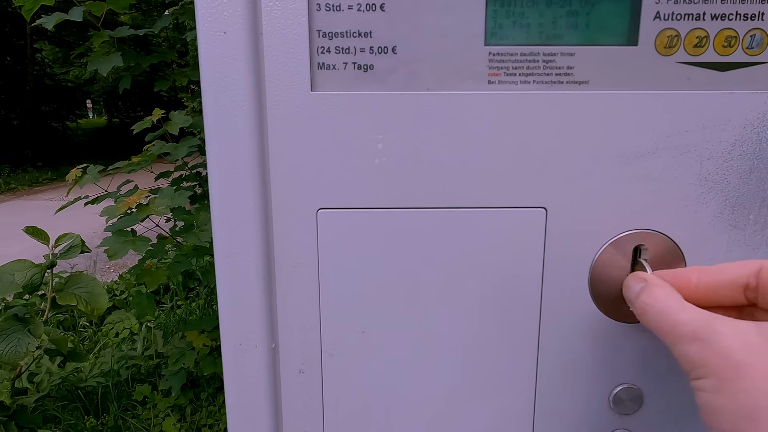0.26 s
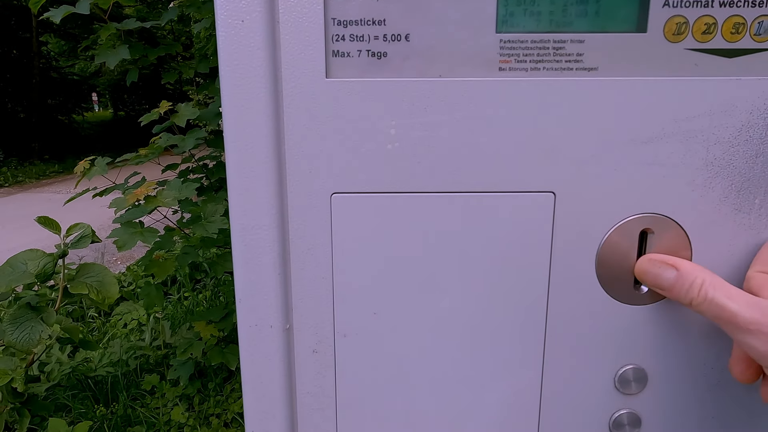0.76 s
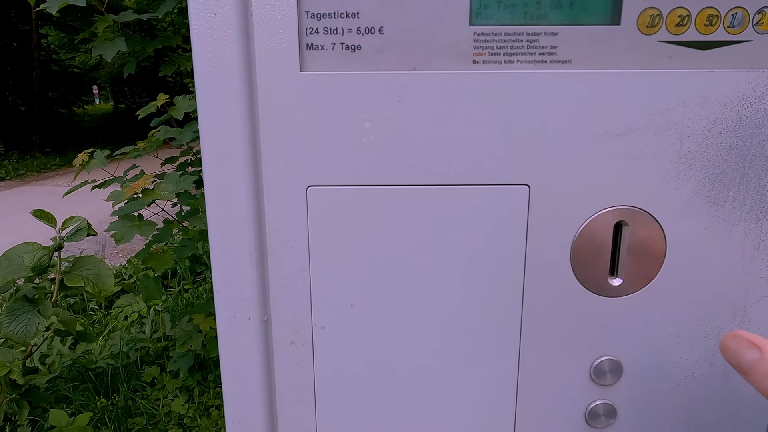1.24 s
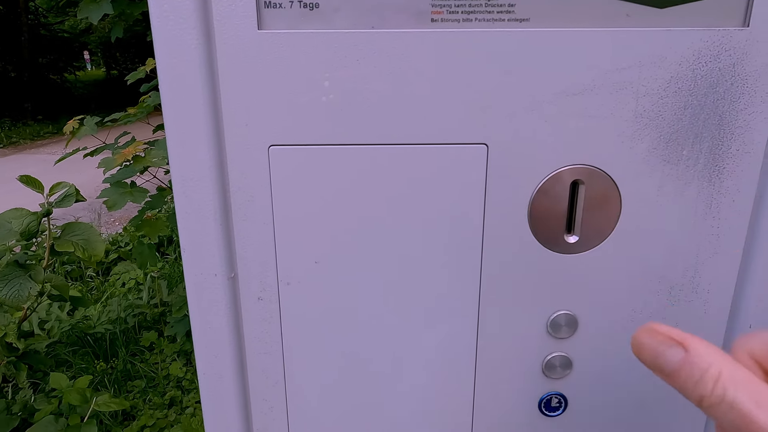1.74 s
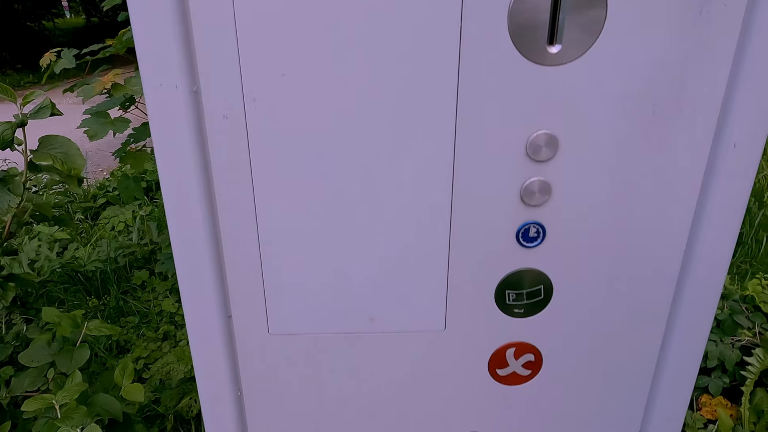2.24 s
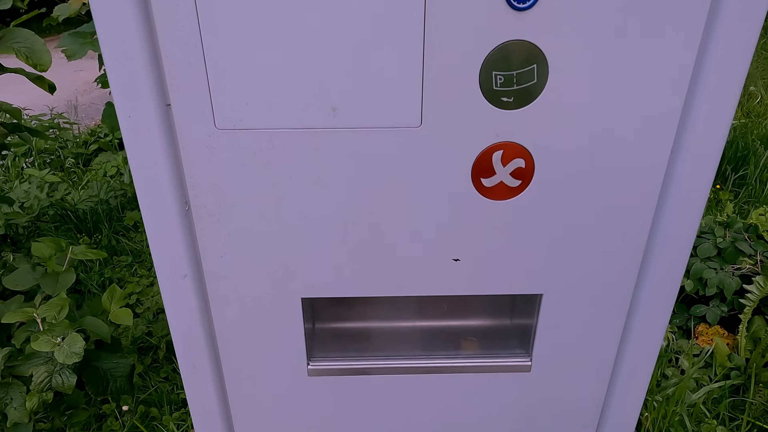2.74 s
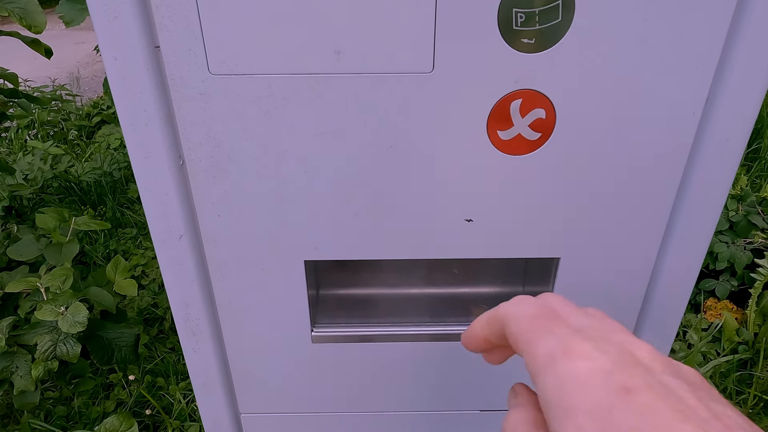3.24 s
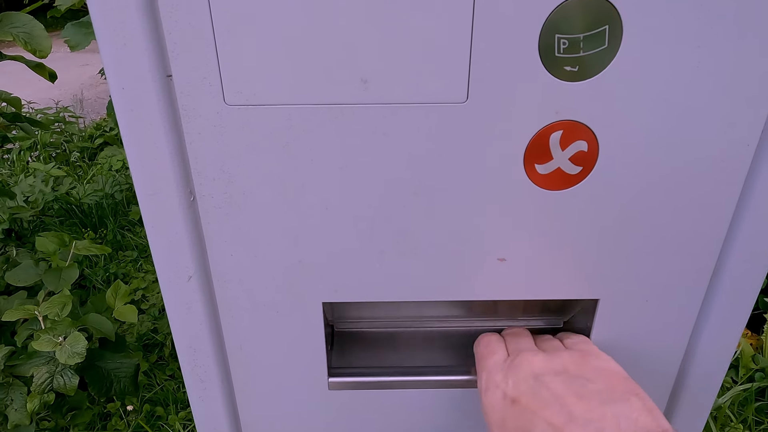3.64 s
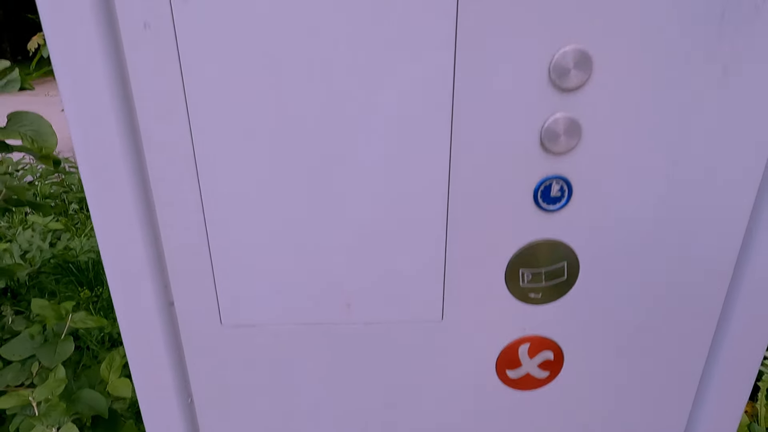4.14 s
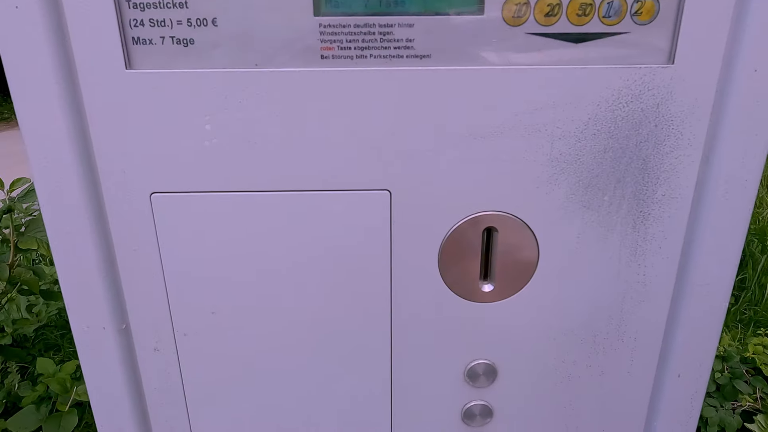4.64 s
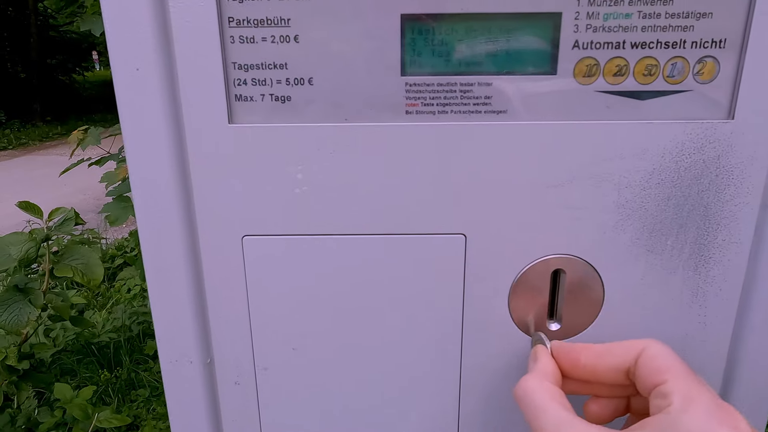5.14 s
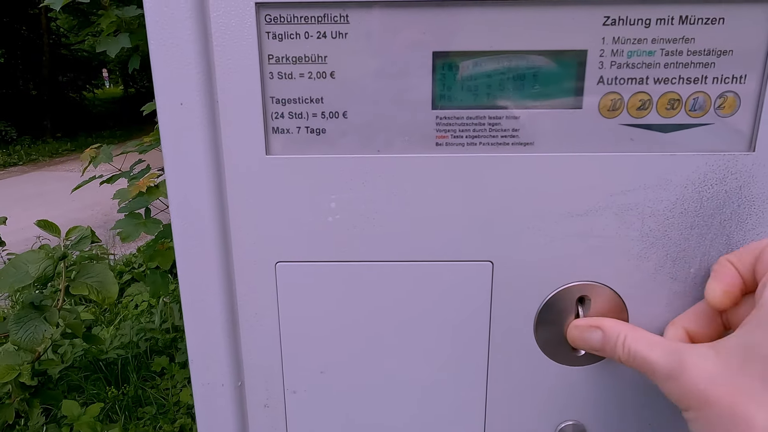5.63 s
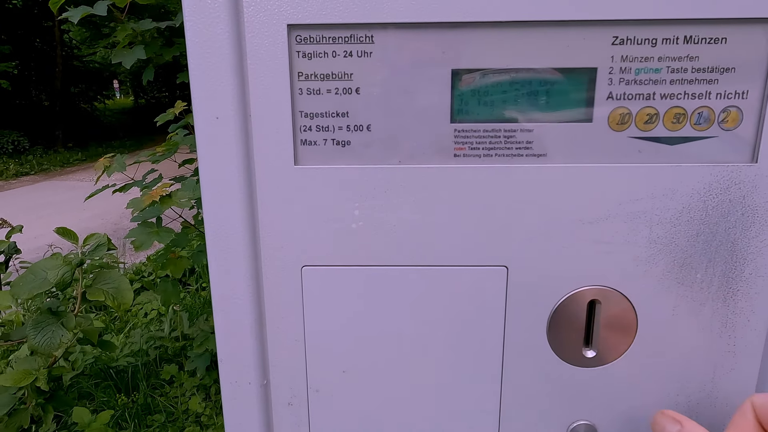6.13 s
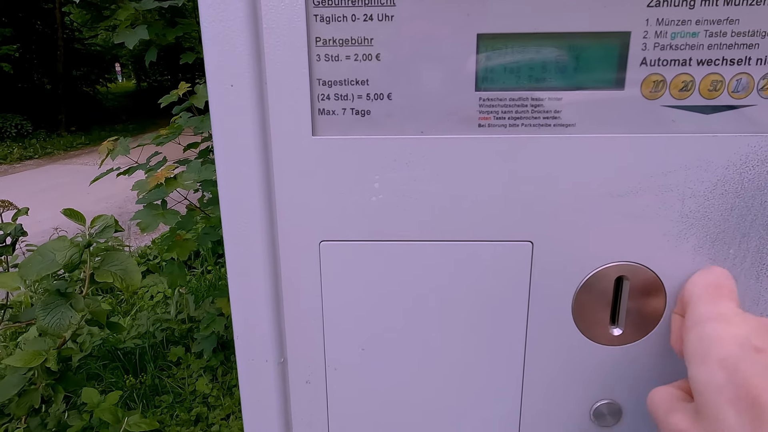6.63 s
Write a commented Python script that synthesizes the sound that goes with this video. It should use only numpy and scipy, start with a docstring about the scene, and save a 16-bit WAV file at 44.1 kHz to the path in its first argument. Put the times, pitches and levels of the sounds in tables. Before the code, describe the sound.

Outdoors in very quiet air, a coin edge ticks against a steel slot, then drops with a short rolling rumble and two hard knocks, clattering brightly into a return tray and rocking to rest. A metal flap knocks open, scrapes, creaks and slams with a hollow clang. More slot taps follow, and a coin drops inside again. Close, nearly mono microphone.

```python
"""Coins in a parking ticket machine

In quiet outdoor air a coin taps the slot; one then runs through the checker and clatters into the return tray.
A hand opens the tray's creaking flap and lets it slam; then a coin goes in again. Blows are filtered noise
bursts plus decaying sines, rolling and rubbing are random grains, and all ring in one steel cabinet."""
import sys
import numpy as np
from scipy import signal
from scipy.fft import rfft, irfft
from scipy.io import wavfile
from scipy.ndimage import uniform_filter1d

SR = 44100
rng = np.random.default_rng(int(sys.argv[2]) if len(sys.argv) > 2 else 0)


def to_wav(sig):
    """Store sig (one row per channel, or 1-D mono) as 16-bit WAV at the path in sys.argv[1].

    Samples outside -1..1 are clipped; the rate is SR.
    """
    pcm = np.clip(np.atleast_2d(sig), -1, 1) * 32767
    pcm = np.round(pcm).astype(np.int16)
    wavfile.write(sys.argv[1], SR, pcm.T)  # frames by channels


N = 303496
TIME = np.arange(N) / SR

# spectrum of the ramp's rumble and the gate's clatter: f/Hz, relative level/dB
RAMP_GATE_COLOUR = [(30, -29), (58, 4.5), (80, -31), (125, 2.5), (200, -8.5), (290, -1), (436, -3),
                    (517, -2.5), (700, 2.5), (1130, -8), (1730, -20.5), (4700, -26.5), (10000, -35)]


def amp(db):
    """Decibels to gain."""
    return 10 ** (np.asarray(db) / 20)


def unit(x):
    """Scales to rms 1."""
    return x / np.sqrt(np.mean(x ** 2) + 1e-20)


def read(points, hz):
    """Interpolates a table on a log-frequency axis."""
    f, value = np.transpose(points)
    return np.interp(np.log(hz + 1), np.log(f + 1), value)


def add(mix, s, sound):
    """Adds a sound into the mix at time s."""
    part = mix[max(round(s * SR), 0):][:len(sound)]
    part += sound[:len(part)]


def uneven(x, gain_db):
    """Applies a gain per frequency bin."""
    return irfft(rfft(x) * amp(gain_db), len(x))


def tint(x, colour):
    """Gives a steady sound a spectrum, at rms 1."""
    return unit(uneven(x, read(colour, np.fft.rfftfreq(len(x), 1 / SR))))


def band(x, lo_hz, hi_hz):
    """Causal band-pass."""
    sos = signal.butter(3, [lo_hz, min(hi_hz, .49 * SR)], "band", fs=SR, output="sos")
    return signal.sosfilt(sos, x)


def fuzzy_tone(hz, width_hz, size=N):
    """Noise in one steep-sided resonance, at rms 1."""
    f = np.fft.rfftfreq(size, 1 / SR)
    resonance = 1 / (1 + (2 * (f - hz) / width_hz) ** 4)
    return unit(irfft(rfft(rng.standard_normal(size)) * resonance, size))


def grit(per_s, spread_db):
    """Random micro-impacts of uneven size, at rms 1."""
    sizes = amp(spread_db * np.minimum(rng.exponential(1, N), 4))
    hit = rng.random(N) < per_s / SR
    return unit(rng.standard_normal(N) * sizes * hit)


def fade(t, t60):
    """Free decay by 60 dB in t60."""
    return np.exp(-np.log(1000) * t / np.maximum(t60, 1e-3))


def stroke(s, rise_s, length_s, fall_db_per_s):
    """Gain of one movement: it picks up speed, holds until its length is over, then dies away."""
    rise = np.clip((TIME - s) / rise_s, 0, 1) ** 2
    return rise * amp(-fall_db_per_s * np.clip(TIME - s - length_s, 0, 1))


def ringing(modes, t):
    """Each mode is a sine that dies away freely."""
    hz, db, t60 = np.transpose(modes)[:, :, None]
    return amp(db) * fade(t, t60) * np.sin(2 * np.pi * hz * t)


def blows(rows, colour, modes, bands_db, clatter_t60, soft_rings, dull_rings, ring_db, cabinet_db,
          rattle_db, rattle_t60, bass_hold, ripple_db):
    """Each blow is a crack of dense sheet-metal modes, a weaker rattle, and clear modes of part and cabinet."""
    # bands_db: bass, body, presence, sparkle against the blow's strength
    # soft_rings, dull_rings: dB of decay time per dB of softness, dullness
    # cabinet modes: f/Hz, relative level/dB, t60/s
    cabinet_modes = [(60.9, -15, 0.46), (116.7, -12, 0.37), (141.8, -15, 0.17), (211, -15, 0.12),
                     (432.6, -19.5, 0.36), (724, -17, 0.37), (998, -23, .6), (1028, -34, 1.6),
                     (1070, -38.5, 1.4), (1283, -36.5, 1.2)]
    # limits of the four bands: f/Hz
    edges = [50, 350, 1500, 7500, 17000]
    # level change of each band per dB of brightness [dB/dB]: hard contacts tip the sound upwards
    tilt = [-0.76, -0.54, 0.03, 0.68]
    crack_db, crack_t60 = -6, 0.009

    out, t = np.zeros(N), np.arange(32768) / SR
    head = SR // 100  # 10 ms, sets each burst's level
    all_modes = list(modes) + [(hz, db + cabinet_db, t60) for hz, db, t60 in cabinet_modes]
    mode_hz = np.transpose(all_modes)[0]
    rings = amp(ring_db) * ringing(all_modes, t)
    mode_band = np.searchsorted(edges[1:-1], mode_hz)
    hz, knots_hz = np.fft.rfftfreq(len(t), 1 / SR), np.arange(0, SR / 2, 110)
    part_ripple = rng.standard_normal(len(knots_hz))
    usual_db = np.mean([row[1] for row in rows])

    for s, strength_db, brightness_db in rows:
        gains = amp(strength_db + np.array(bands_db) + brightness_db * np.array(tilt))
        t60 = clatter_t60 * amp(soft_rings * (usual_db - strength_db) - dull_rings * brightness_db)
        # treble resonances belong partly to the part, partly to the spot struck
        spot_ripple = rng.standard_normal(len(knots_hz))
        ripple = np.interp(hz, knots_hz, np.tanh((part_ripple + spot_ripple) / 2))
        clatter = tint(rng.standard_normal(len(t)), colour)
        dense = uneven(clatter, ripple_db * ripple * np.minimum(hz / edges[2], 1))
        for k, hold in enumerate([bass_hold, 1, 1, 1]):
            crack = amp(crack_db) / hold * fade(t, crack_t60)
            rattle = amp(rattle_db) * fade(t, rattle_t60)
            burst = band(dense * (crack + fade(t, t60 * hold) + rattle), edges[k], edges[k + 1])
            add(out, s, gains[k] * burst / np.std(burst[:head]))
        # the point of contact sets each mode's strength and sign
        contact = rng.choice([-1, 1], len(mode_hz)) * rng.uniform(.7, 1.3, len(mode_hz))
        add(out, s, (gains[mode_band] * contact) @ rings)
    return out


def background(air_db=-71, hiss_db=-73, hiss_hz=4680, hiss_width_hz=620):
    """Quiet outdoor air, a steady narrow hiss, and a faint hollow sound dying away at the start."""
    # outdoor air: f/Hz, relative level/dB
    air_colour = [(20, -1.5), (30, -23), (55, -1.5), (85, -12), (135, -10), (260, -18.5), (400, -15.5),
                  (550, -19), (850, -18.5), (1500, -23), (3000, -32.5), (6000, -33.5), (16000, -38.5)]
    # hollow resonances: f/Hz, width/Hz, relative level/dB
    hollow_tones = [(361, 71, 8), (675, 110, 1.5), (890, 61, 4.5), (1630, 320, 2.5), (880, 3400, 4.5),
                    (2400, 300, -28)]
    hollow_db, hollow_fall_db_per_s = -51.5, 102
    air = amp(air_db) * tint(rng.standard_normal(N), air_colour)
    hiss = amp(hiss_db) * fuzzy_tone(hiss_hz, hiss_width_hz)
    hollow = unit(sum(amp(db) * fuzzy_tone(hz, width_hz) for hz, width_hz, db in hollow_tones))
    return air + hiss + hollow * amp(hollow_db - hollow_fall_db_per_s * TIME)


def slot():
    """A coin's edge taps the slot, whose steel rings briefly."""
    # taps: t/s, strength/dB, brightness/dB
    taps = [(0.1244, -61.5, -28.5), (0.246, -41.5, 1), (0.2639, -41.5, -12), (0.2793, -50.5, -16),
            (0.3148, -48, -16), (0.3332, -36.5, 6), (0.3362, -36, -4.5), (0.4103, -46.5, -10),
            (0.4608, -60, 24), (0.4654, -42, 7), (0.612, -40.5, 1), (1.3932, -52.5, -3), (1.4074, -47, -3),
            (1.4174, -35.5, 1), (5.1063, -35.5, -8.5), (5.3128, -45, -0.5), (5.335, -44, -16.5),
            (5.4105, -40.5, 14), (5.4160, -35.5, -8), (5.6222, -36.5, 10.5), (5.7518, -37.5, 2),
            (5.8002, -54.5, -13), (6.5138, -53.5, 5), (6.537, -39.5, 6.5), (6.5454, -36, 3)]
    # clatter spectrum: f/Hz, relative level/dB
    colour = [(35, -44), (60, -19), (250, -1.5), (380, -11.5), (903, -8), (1440, -7.5), (1780, -8.5),
              (2650, -2), (3190, -1.5), (5860, 3), (8320, -16), (11000, -17), (16000, -31)]
    # slot modes: f/Hz, relative level/dB, t60/s
    modes = [(927, -8, 0.0837), (2600, -14.5, .07), (5380, -23.5, .05), (7020, -10, 0.04)]
    return blows(taps, colour, modes, bands_db=[-30, -19, -13.5, -17.5], clatter_t60=0.059,
                 soft_rings=0.05, dull_rings=0.18, ring_db=5.0, cabinet_db=-1,
                 rattle_db=-16, rattle_t60=0.18, bass_hold=3.2, ripple_db=8.5)


def gate():
    """The gate behind the slot knocks dully and excites only the cabinet's modes."""
    # knocks: t/s, strength/dB, brightness/dB
    knocks = [(0.5468, -56.5, -10), (1.5022, -39, 3.5), (5.6558, -55.5, 0.5), (5.704, -53, 2),
              (6.5507, -41.5, -4)]
    return blows(knocks, RAMP_GATE_COLOUR, [], bands_db=[-7.0, -3, -18, -32.5], clatter_t60=0.19,
                 soft_rings=-0.083, dull_rings=-0.28, ring_db=4.5, cabinet_db=4.5,
                 rattle_db=-14.0, rattle_t60=0.12, bass_hold=3.35, ripple_db=5.0)


def rolling(panel_db=-3, attack_s=0.012):
    """The coin's milled edge drums on the ramp and wakes the cabinet's panels."""
    # rumbles on the ramp: t/s, length/s, level/dB, fall/(dB/s)
    rumbles = [(0.553, 0.12, -57, 173), (1.52, 0.052, -55.5, 99), (5.634, 0.16, -63, 246),
               (6.556, 0.073, -45.5, 171)]
    panels = unit(sum(fuzzy_tone(hz, width_hz=7.9) for hz in [138.3, 722, 974, 1138.4]))
    drumming = tint(grit(per_s=5100, spread_db=1.0), RAMP_GATE_COLOUR)
    rumble = unit(drumming + amp(panel_db) * panels)
    return rumble * sum(amp(db) * stroke(s, attack_s, length_s, fall) for s, length_s, db, fall in rumbles)


def squeaks(width_hz=420, scratch_db=-9):
    """Short squeaks: bursts of narrow noise with some scratch."""
    # squeaks: t/s, length/s, f/Hz, level/dB
    rows = [(0.666, 0.014, 2010, -61.5), (3.761, 0.059, 5520, -61.5), (4.037, 0.015, 6100, -46.5),
            (5.254, 0.041, 3780, -56.5), (5.271, 0.014, 1970, -60.5), (5.619, 0.0076, 4100, -54.5)]
    out = np.zeros(N)
    for s, length_s, hz, db in rows:
        size = int(length_s * SR)
        scratch = unit(band(rng.standard_normal(size), 1200, 9000))
        squeak = fuzzy_tone(hz, width_hz, size=size) + amp(scratch_db) * scratch
        add(out, s, amp(db) * unit(squeak * np.hanning(size)))
    return out


def checker():
    """The coin strikes the parts of the checker."""
    # hits: t/s, strength/dB, brightness/dB
    hits = [(1.4851, -24.5, 1.5), (1.515, -26, -4), (1.575, -47.5, 0), (6.6037, -24.5, -2.5),
            (6.633, -26.5, -3.5), (6.6905, -46, 1), (6.7598, -48.5, -4)]
    # clatter spectrum: f/Hz, relative level/dB
    colour = [(35, -38), (60, -7), (146, 0), (212, -14), (294, -3.5), (527, -3), (651, -1), (924, -11),
              (1380, -7), (1550, -14), (1950, -9), (3580, -8.5), (6000, -7), (13900, -19), (16000, -41.5)]
    # checker modes: f/Hz, relative level/dB, t60/s
    modes = [(830, 0.5, 0.033), (1992, -18, 0.24), (2940, -22.5, 0.1386), (4614, -22, 0.19),
             (6000, -10, 0.047), (6400, -12.5, .07), (6630, -6.5, 0.013), (12480, -11, 0.055),
             (14400, -9.5, .05)]
    return blows(hits, colour, modes, bands_db=[-26.5, -22.0, -16.5, -20.5], clatter_t60=0.0666,
                 soft_rings=0.096, dull_rings=0.367, ring_db=8, cabinet_db=-4,
                 rattle_db=-14.0, rattle_t60=0.16, bass_hold=2.5, ripple_db=14)


def pings():
    """The coin's own disc modes ring freely as it glances off a pin."""
    # contacts: t/s, level/dB
    contacts = [(1.575, -49.5), (6.691, -59), (6.758, -65)]
    # disc modes: f/Hz, relative level/dB, t60/s
    coin_modes = [(6245, 0, 0.1), (1900, -8.5, 0.23), (2790, -8, 0.12), (4690, -5, 0.1008),
                  (7327, -21.5, 0.111), (9170, -7, 0.037), (14000, -19, 0.087)]
    out, t = np.zeros(N), np.arange(SR // 4) / SR
    ring = ringing(coin_modes, t).sum(axis=0)
    for s, db in contacts:
        add(out, s, amp(db) * ring)
    return out


def tray():
    """The coin falls and bounces in the return tray."""
    # hits: t/s, strength/dB, brightness/dB
    hits = [(1.7634, -19, 7.5), (1.7664, -20.5, 6), (1.7804, -29.5, -1.5), (1.8422, -34.5, -16),
            (1.8731, -39, -4), (1.8924, -45.5, -2), (1.927, -50.5, -4), (1.9465, -28, 7),
            (1.9964, -40.5, -7), (2.0053, -38, -5.5), (2.0174, -38, 2.5), (2.0806, -51.5, -4),
            (2.1296, -39, -0.5), (2.169, -40, -2), (2.1934, -41.5, -3), (2.541, -62, -11)]
    # clatter spectrum: f/Hz, relative level/dB
    colour = [(35, -36.5), (60, -8.5), (164, -23.5), (380, -13.5), (437, -15.5), (503, -10), (579, -9.5),
              (991, 0.5), (1700, -15.5), (3040, -7), (4030, -12.5), (4530, -5.5), (5330, -11.5),
              (8510, -21.5), (16000, -37)]
    # tray modes: f/Hz, relative level/dB, t60/s
    modes = [(423.3, -12.5, 0.16), (597, -9.5, 0.17), (1018, -12, 0.18), (1080, -10.5, .16),
             (1225, -2.5, 0.13), (2970, -21, 0.21), (3496, -7, 0.033), (4420, -5.5, 0.051),
             (7000, -7.5, 0.057), (8300, -6.5, 0.053), (11800, -16.5, 0.12)]
    return blows(hits, colour, modes, bands_db=[-29.5, -11.5, -12.5, -17.5], clatter_t60=0.056,
                 soft_rings=0.15, dull_rings=-0.072, ring_db=0.5, cabinet_db=0,
                 rattle_db=-17.5, rattle_t60=0.19, bass_hold=1.2, ripple_db=5)


def rocking(start_s=2.239, turn_s=0.0535, shrink=0.995, second_s=.015, db=-67, fall_db=2.2, uneven_db=2,
            t60=0.051, ring_db=-2):
    """The coin rocks to rest in the curved tray, ever faster and fainter: two ringing ticks per turn."""
    out, t = np.zeros(N), np.arange(SR // 8) / SR
    for k in range(11):
        s = start_s + turn_s * np.sum(min(shrink, 1) ** np.arange(k))
        for delay_s in (0, second_s):
            tick = unit(band(rng.standard_normal(len(t)), 2000, 6400))
            tones = [fuzzy_tone(hz, width_hz=240, size=len(t)) for hz in [2550, 3000, 5600, 6700, 8150]]
            gain = amp(db - fall_db * k + uneven_db * rng.standard_normal())
            add(out, s + delay_s, gain * (tick + amp(ring_db) * unit(sum(tones))) * fade(t, t60))
    return out


def flap():
    """The flap knocks against fingers, coin and its stops."""
    # hits: t/s, strength/dB, brightness/dB
    hits = [(3.3803, -49, -11.5), (3.4715, -19.5, 2), (3.4746, -14, 4.5), (3.4995, -26.5, -3.5),
            (3.5828, -45.5, -9.5), (3.7045, -39.5, -11.5), (4.0435, -42, 1), (4.1009, -22, -4.5),
            (4.1021, -18.5, 14), (4.15, -28.5, -5)]
    # clatter spectrum: f/Hz, relative level/dB
    colour = [(60, -15.5), (124, 1), (230, -13), (320, -17.5), (417, -3), (520, -12), (680, -5), (880, 1.5),
              (1100, -1.5), (1350, -6), (1600, -12.5), (2050, -22.5), (3040, -15), (4000, -13.5),
              (5800, -12), (8500, -22.5), (12100, -29.5), (16000, -41.5)]
    # flap modes: f/Hz, relative level/dB, t60/s
    modes = [(576.5, -27, 0.25), (890, -4.5, .09), (1070, -19, 0.222), (1133, -14.5, 0.19),
             (1652, -15, 0.078), (2870, -24, 0.18), (3040, -26, .26), (3025, -26.5, 0.68),
             (3360, -19.5, 0.37), (3570, -19.5, 0.22), (5920, -25.5, .25), (8807, -21, .25),
             (9724, -18, .15), (12240, -26, 0.2)]
    return blows(hits, colour, modes, bands_db=[-25, -10.5, -15, -23.0], clatter_t60=0.079,
                 soft_rings=0.061, dull_rings=0.074, ring_db=-0.5, cabinet_db=-0.5,
                 rattle_db=-22, rattle_t60=0.14, bass_hold=2.15, ripple_db=10.0)


def rubbing(strokes, body_db, grit_db, sing_db, judder_db=4.5, fall_db_per_s=401):
    """Stick-slip grains heard through the steel: low body, bright grit, and randomly catching upper modes."""
    # spectrum of the grains: f/Hz, relative level/dB
    grain_colour = [(100, -5), (300, -15.5), (600, -2), (850, -8.5), (1120, 3.5), (1280, -4.5),
                    (1550, -21.5), (1750, -15), (2300, -23), (3250, -12.5), (3950, -23), (6000, -18),
                    (7300, -24), (9600, -31), (16000, -42.5)]
    grains = tint(grit(per_s=1800, spread_db=2.0), grain_colour)
    singing = np.zeros(N)
    for hz in [3160, 4375, 5540, 5840, 7470]:
        grip = unit(uniform_filter1d(rng.standard_normal(N), size=900))
        singing += fuzzy_tone(hz, width_hz=160) * amp(2 * judder_db * grip)
    body = amp(body_db) * unit(band(grains, 220, 1700))
    scratch = unit(band(grains, 1900, 16000))
    bright = amp(grit_db) * unit(scratch + amp(sing_db) * unit(singing))
    out = np.zeros(N)
    for s, rise_s, length_s, low_db, high_db in strokes:
        out += (amp(low_db) * body + amp(high_db) * bright) * stroke(s, rise_s, length_s, fall_db_per_s)
    return out


def scraping():
    """Rubbing strokes of the flap as it moves."""
    # strokes: t/s, rise/s, length/s, relative body level/dB, relative grit level/dB
    strokes = [(3.388, 0.036, 0.041, -32.5, -43.5), (3.688, 0.014, 0.039, -36.5, -45.5),
               (3.80, 0.023, 0.042, -49, -48), (3.865, 0.019, 0.093, -66.5, -69),
               (3.988, 0.015, 0.045, -57.5, -60.5), (4.035, 0.018, 0.066, -37, -44.5),
               (4.148, 0.008, 0.017, -36, -57)]
    return rubbing(strokes, body_db=-5, grit_db=-2.5, sing_db=-6)


def hinge(jitter=0.014, partials_db=(0, -1, -17, -22, -14), attack_s=0.014, fall_db_per_s=451):
    """The flap's hinge slips regularly enough to sing: a rough note rises as it opens, falls as it shuts."""
    # creaks: t/s, length/s, starting f/Hz, glide/(Hz/s), level/dB
    creaks = [(3.819, 0.095, 620.4, 308, -60), (3.98, 0.048, 638, -1000, -52.5)]
    out = np.zeros(N)
    for s, length_s, hz, glide_hz_per_s, db in creaks:
        waver = 1 + jitter * unit(uniform_filter1d(rng.standard_normal(N), size=150))
        pitch_hz = (hz + glide_hz_per_s * np.clip(TIME - s, 0, length_s)) * waver
        phase = 2 * np.pi * np.cumsum(pitch_hz) / SR
        note = sum(amp(partial_db) * np.sin((k + 1) * phase) for k, partial_db in enumerate(partials_db))
        out += amp(db) * stroke(s, attack_s, length_s, fall_db_per_s) * note
    return out


def slam(s=4.1, length_s=0.0053, hz=800, db=-14, puff_hz=330, puff_db=-25):
    """The closing flap shoves its whole panel: a clap of a few cycles over one low puff of air from the tray."""
    out, t = np.zeros(N), np.arange(int(length_s * SR)) / SR
    clap = amp(db) * np.sin(2 * np.pi * hz * t)
    puff = amp(puff_db) * np.sin(2 * np.pi * puff_hz * (t - length_s / 2))
    add(out, s, np.hanning(len(t)) * (clap + puff))
    return out


def sliding():
    """The coin slides against the slot."""
    # slides: t/s, rise/s, length/s, relative body level/dB, relative grit level/dB
    slides = [(5.38, 0.021, 0.051, -62.5, -51.5), (5.592, 0.015, 0.03, -71, -57.5),
              (6.512, 0.0076, 0.024, -67, -61)]
    return rubbing(slides, body_db=0.5, grit_db=-8.5, sing_db=-21)


def cabinet(x):
    """The hollow steel box and the yard ring on diffusely: noise with its own decay in each band."""
    # decay: f/Hz, t60/s
    ring_time = [(100, 1.63), (400, 0.46), (1000, 0.96), (2000, 1.46), (3200, 0.87), (6000, 0.63),
                 (14000, 0.57)]
    # strength: f/Hz, level/dB
    ring_level = [(100, -10), (400, -10.5), (1000, -21), (2000, -22), (3200, -16), (6000, -29),
                  (14000, -21.5)]
    hz, t, z = signal.stft(rng.standard_normal(SR), SR, nperseg=256)
    decay = fade(t, read(ring_time, hz)[:, None])
    decay *= amp(read(ring_level, hz))[:, None] / np.sqrt(SR * np.mean(decay ** 2, axis=1, keepdims=True))
    tail = signal.istft(z * decay, SR, nperseg=256)[1]
    return signal.fftconvolve(x, tail)[:N]


def sideways(machine, air_db=-1, machine_db=-2, spread_t60=.03):
    """Left-right difference: an independent background and a faint, brief noisy spread of the machine's sound."""
    # width of the background: f/Hz, relative side level/dB
    air_width = [(60, -21.5), (110, -19), (200, -19.5), (380, -18.5), (700, -17.5), (1290, -29),
                 (2380, -8.5), (4400, -32), (8120, -2), (15000, -2.5)]
    # width of the machine: f/Hz, relative side level/dB
    machine_width = [(60, -28.5), (110, -46), (200, -40.5), (380, -34), (700, -43), (1290, -46),
                     (2380, -38), (4400, -32.5), (8120, -26), (15000, -16.5)]
    hz, t = np.fft.rfftfreq(N, 1 / SR), np.arange(SR // 20) / SR
    spread = rng.standard_normal(len(t)) * fade(t, spread_t60)
    noisy_machine = signal.fftconvolve(machine, spread / np.linalg.norm(spread))[:N]
    air_side = uneven(background(), air_db + read(air_width, hz))
    return air_side + uneven(noisy_machine, machine_db + read(machine_width, hz))


def scene():
    """All parts sound through the same cabinet, straight ahead and nearly mono."""
    machine = slot() + gate() + rolling() + squeaks() + checker() + pings() + tray() + rocking()
    machine += flap() + scraping() + hinge() + slam() + sliding()
    mid = machine + cabinet(machine) + background()
    side = sideways(machine)
    return np.array([mid + side, mid - side])


def record(dry, edge_hz=16450):
    """The recorder's band limit, a linear-phase low-pass."""
    lowpass = signal.firwin(511, edge_hz, window=("kaiser", 9), fs=SR)
    return signal.oaconvolve(dry, lowpass[None], "same")


dry = scene()
out = record(dry)
to_wav(out)
```